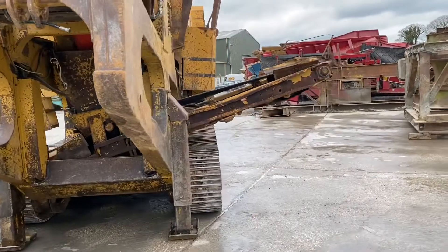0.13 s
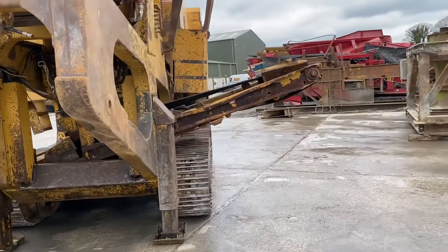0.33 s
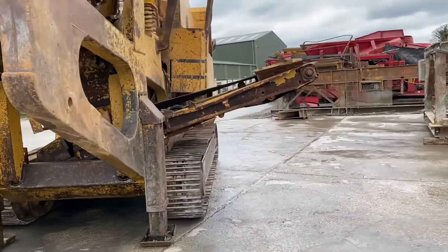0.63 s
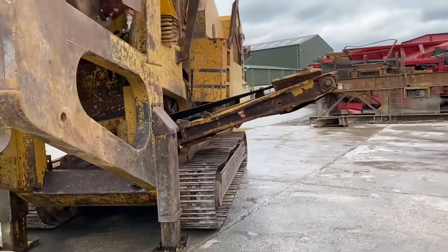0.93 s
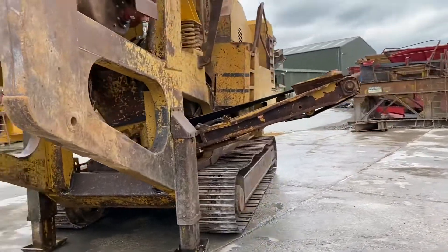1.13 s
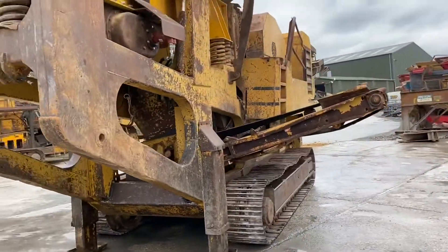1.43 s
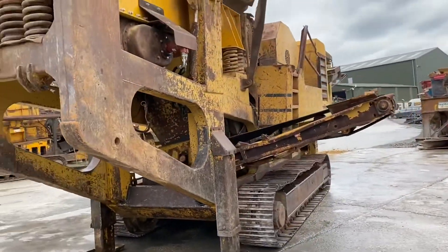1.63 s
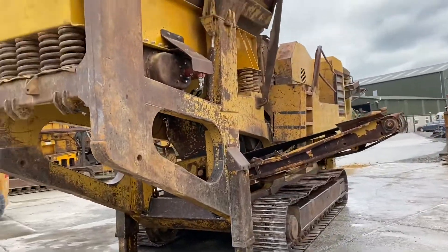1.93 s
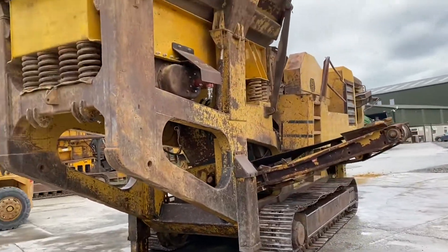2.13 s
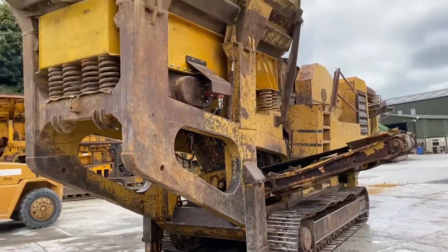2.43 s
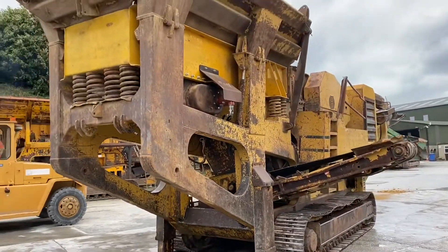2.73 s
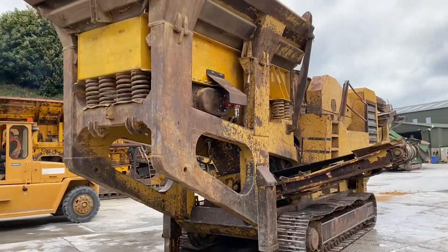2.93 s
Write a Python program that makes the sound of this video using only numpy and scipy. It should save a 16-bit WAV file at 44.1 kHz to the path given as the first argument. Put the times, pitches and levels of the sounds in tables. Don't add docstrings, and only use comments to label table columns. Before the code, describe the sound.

Rock crusher working: irregular stone blows clang and boom on steel above steady engine and fan roar.

```python
import sys
import numpy as np
from scipy import signal
from scipy.fft import rfft, irfft
from scipy.io import wavfile
from scipy.ndimage import uniform_filter1d

SR = 44100
rng = np.random.default_rng(int(sys.argv[2]) if len(sys.argv) > 2 else 0)


def gain_from_db(level_db):
    decades = np.asarray(level_db, float) / 20
    return 10 ** decades


def persist_wave(psi):
    counts = np.round(np.clip(psi, -1, 1) * 32767).astype(np.int16)
    wavfile.write(sys.argv[1], SR, np.atleast_2d(counts).T)


N = 136710


def evened(x):
    return x / np.sqrt(np.mean(x ** 2) + 1e-20)


def read(points, hz):
    f, value = np.transpose(points)
    return np.interp(np.log(hz + 1), np.log(f + 1), value)


def colour(x, points):
    half = np.log(gain_from_db(read(points, np.fft.rfftfreq(8192, 1 / SR))))
    full = np.r_[half, half[-2:0:-1]]
    taps = np.fft.ifft(np.exp(np.conj(signal.hilbert(full)))).real[:4096]
    return signal.oaconvolve(x, taps[None] / np.linalg.norm(taps), axes=1)[:, :N]


def decays(times, levels_db, rise_s, t60_s):
    t, hits = np.arange(SR) / SR, np.zeros(N)
    np.add.at(hits, (np.asarray(times) * SR).astype(int), gain_from_db(2 * levels_db))
    shape = (1 - np.exp(-t / rise_s)) ** 2 * gain_from_db(-120 * t / t60_s)
    power = signal.fftconvolve(hits, shape / shape.max())[:N]
    return np.sqrt(abs(power))


def load_db():
    # t/s, level/dB
    load_points = [(0, -29.5), (.45, -30), (.75, -27), (.85, -27.5), (1.1, -25.5), (1.4, -28.5),
                   (1.86, -25.5), (2.15, -31), (2.5, -30), (2.75, -29.5), (3.1, -30.5)]
    return np.interp(np.arange(N) / SR, *np.transpose(load_points))


def yard(x):
    t60_s = 0.43
    taps = np.zeros((2, SR // 2))
    slots = np.arange(500, SR // 2 - 20, 20)
    at = slots + rng.integers(0, 20, (2, (SR // 2 - 501) // 20))
    np.put_along_axis(taps, at, rng.choice([-1., 1.], at.shape), 1)
    taps *= gain_from_db(-60 * np.arange(SR // 2) / SR / t60_s)
    return signal.fftconvolve(x[:1], taps / np.linalg.norm(taps[0]), axes=1)[:, :N]


def roar():
    # f/Hz, level/dB per Hz
    roar_tone = [(12, -39), (20, -14.5), (58, -9), (182, -3), (410, -8.5), (446, -17.5), (9140, -47),
                 (11100, -56), (16000, -66)]
    level_db, patch_db, follows_load = -19, 1.6, 0.7
    z = signal.stft(rng.standard_normal((2, N + 2048)), nperseg=512)[2]
    drift = uniform_filter1d(rng.standard_normal(z.shape[1:]), 6, 0)
    patches = evened(uniform_filter1d(drift, 10, 1))
    noise = signal.istft(z * gain_from_db(patch_db * patches), nperseg=512)[1][:, :N]
    load = load_db()
    return gain_from_db(level_db + follows_load * (load - load[0])) * evened(colour(noise, roar_tone))


def engine():
    # multiple of the cycle rate [1], level/dB, wander width/Hz
    orders = [(2.5, -34, 1.3), (3, -27, 1.6), (4, -23, 4.5), (7, -30, 6.1), (8, -24, 11.4),
              (10.4, -27.5, 10.2), (13.4, -29, 20.6), (15.4, -37.5, 8.3)]
    cycle_hz, steady = 23.875, 0.62
    t, out = np.arange(N) / SR, np.zeros(N)
    for multiple, db, width in orders:
        r = np.exp(-np.pi * width / SR)
        slow_noise = rng.standard_normal((2, N + SR))
        wander = signal.lfilter([1], [1, -2 * r, r * r], slow_noise)[:, SR:]
        swing = steady + (1 - steady) * (evened(wander[0]) + 1j * evened(wander[1]))
        out += gain_from_db(db) * (swing * np.exp(2j * np.pi * multiple * cycle_hz * t)).real
    return np.array([out, out[::-1]])


def rattle():
    # f/Hz, level/dB per Hz
    click_tone = [(180, -34.5), (300, -6.5), (1120, -12.5), (1340, -16), (6620, -38), (8640, -48),
                  (10600, -37), (16000, -54)]
    plate_hz = [1663, 1862, 2149, 2600, 3240, 3742, 4235, 4787, 5283, 5841, 6425]
    clicks_per_s, spread_db, click_trim_db = 700, -2.5, -1
    pings_per_s, ping_trim_db, ping_t60_s = 110, -12.5, 0.13
    stones = gain_from_db(spread_db * np.minimum(rng.exponential(1, N), 4))
    stones = stones * (rng.random(N) < clicks_per_s / SR)
    n = np.arange(900)
    puff = signal.oaconvolve(stones, n * gain_from_db(-60 * n / SR / 0.027))[:N]
    clicks = evened(colour(rng.standard_normal((2, N)) * puff, click_tone))

    struck = rng.integers(0, len(plate_hz), N)
    t, pings = np.arange(SR // 10) / SR, np.zeros((2, N))
    taps = rng.random(N) * (rng.random(N) < pings_per_s / SR)
    for k, hz in enumerate(plate_hz):
        fade = gain_from_db(-60 * t / ping_t60_s - 1.6 * np.log2(hz / 1300))
        ping = np.sin(2 * np.pi * hz * t) * fade
        pings[k % 2] += signal.oaconvolve(taps * (struck == k), ping)[:N]
    band_db = 8
    return gain_from_db(load_db()) * (gain_from_db(click_trim_db + band_db) * clicks + gain_from_db(ping_trim_db) * evened(pings))


def chips():
    # t/s, level/dB
    snaps = [(0.216, -33), (0.4015, -39), (0.7712, -21), (0.844, -23), (0.9507, -38), (1.0127, -17),
             (1.085, -23), (1.1772, -26), (1.2341, -30), (1.5604, -37), (1.8402, -46), (2.0444, -37),
             (2.4458, -30.5), (2.4773, -34), (2.4892, -22), (2.508, -26), (2.6963, -32)]
    # f/Hz, level/dB per Hz
    snap_tone = [(4000, 10), (6500, -19), (10000, 8), (16000, -18)]
    s, db = np.transpose(snaps)
    envelope = decays(s, db - 1, rise_s=0.0003, t60_s=0.02)
    return colour(rng.standard_normal((2, N)) * envelope, snap_tone)


def booms():
    # t/s, f/Hz, level/dB
    frame_panels = [(0.169, 70.7, -19), (0.558, 189.5, -18), (0.771, 190.2, -10.5), (.78, 255.6, -15),
                    (0.791, 310.6, -11), (.85, 213, -18), (0.968, 153, -14), (0.998, 314, -17),
                    (1.029, 114.3, -12.5), (1.17, 252.7, -18), (1.472, 172, -16), (1.641, 90, -27),
                    (1.992, 367.5, -20.5), (2.28, 96, -13.5), (2.281, 360, -18), (2.481, 91, -12),
                    (2.498, 176, -13.5), (2.5, 302.2, -17.5), (2.879, 66.6, -15.5)]
    # t/s, f/Hz, level/dB
    side_panels = [(0.019, 292, -17), (0.119, 174, -23), (0.374, 454, -19), (0.542, 198, -11.5),
                   (0.767, 171, -6), (1.439, 173, -12), (1.489, 188.4, -10), (1.49, 490, -15.5),
                   (1.767, 181, -19.5), (1.994, 353, -16.2), (2.267, 166.5, -20.5), (2.281, 378, -14),
                   (2.502, 299.4, -9.5), (2.68, 371, -16), (2.809, 410, -22), (2.988, 399, -20)]
    out, t = np.zeros(N + SR), np.arange(SR // 2) / SR
    # panels, rise [s], t60 [s], trim [dB]
    groups = [(frame_panels, 0.012, 0.33, 0), (side_panels, 0.0044, 0.1, 2.5)]
    for panels, rise_s, t60_s, trim_db in groups:
        for s, hz, db in panels:
            swell = (1 - np.exp(-t / rise_s)) * gain_from_db(db + trim_db + 5.5 - 60 * t / t60_s)
            out[round(s * SR):][:len(t)] += np.sin(2 * np.pi * hz * t) * swell
    return np.array([out[:N], np.zeros(N)])


def rings():
    # t/s, f/Hz, level/dB, time to fade by 60 dB/s
    loose_plates = [(.115, 2380, -30, 0.045), (.385, 6700, -47, 0.091), (0.928, 2780, -34, 0.05),
                    (1.013, 10200, -52, 0.19), (1.095, 3745, -32, 0.19), (1.09, 6422, -43.5, 0.61),
                    (1.202, 4340, -41, 0.15), (1.23, 6490, -37, .08), (1.28, 6480, -45.5, .1),
                    (3.01, 4380, -37, 0.04), (1.383, 4790, -37, 0.2), (1.424, 4780, -41, 0.3),
                    (1.51, 4300, -39, .1), (1.63, 4240, -42, 0.2), (1.692, 4240, -42, .3),
                    (1.661, 3240, -35, 0.1), (1.835, 6480, -39.5, .08), (1.845, 5800, -38, .04),
                    (1.885, 6680, -33.5, 0.062), (1.914, 4250, -41, 0.25), (2.31, 2570, -33, .1),
                    (2.345, 6860, -36, 0.045), (2.445, 1330, -24, 0.083), (2.5095, 6900, -14.5, 0.012),
                    (2.518, 4770, -34, .04), (2.691, 2280, -38, 0.12), (2.642, 520, -21, .035),
                    (2.868, 2050, -24, 0.03), (2.881, 2515, -26, 0.03), (2.892, 2960, -32, .04)]
    # t/s, f/Hz, level/dB
    clinks = [(0.334, 1981, -34.5), (0.375, 2799, -36), (0.378, 2132, -31.5), (0.77, 5254.0, -38),
              (0.778, 1206, -30), (0.778, 1916, -27), (0.783, 7092.0, -38), (0.789, 3503.0, -34.5),
              (0.818, 6316.0, -35.5), (0.825, 926, -22.5), (1.009, 6460.0, -36), (1.019, 2929, -40),
              (1.035, 1637, -26.5), (1.051, 2649, -33), (1.166, 1098, -18.5), (1.357, 6517.0, -39),
              (1.364, 1658, -32), (1.364, 2153, -32.5), (1.491, 2326, -33.0), (1.504, 2024, -40),
              (1.65, 2584, -36), (1.671, 5340.0, -43), (1.997, 1981, -31.0), (2.015, 6546.0, -44.1),
              (2.051, 2519, -34), (2.269, 1550, -29.0), (2.27, 4881.0, -37), (2.275, 4393.0, -40),
              (2.282, 5139.0, -39.1), (2.449, 1292, -27.5), (2.52, 3761.0, -37.6), (2.807, 3732.0, -31.5),
              (2.865, 1873, -35), (2.866, 1701, -30.5), (3.008, 5139.0, -41.5)]
    clink_t60_s, clink_trim_db, roughness = 0.075, 1, 0.7
    walls = [(s, hz, db + clink_trim_db, clink_t60_s) for s, hz, db in clinks]
    out, t = np.zeros(N + SR), np.arange(SR // 2) / SR
    for s, hz, db, t60 in list(loose_plates) + walls:
        shake = evened(uniform_filter1d(rng.standard_normal(len(t)), size=300))
        chatter = 1 + roughness * np.minimum(t / 0.022, 1) * shake
        fade = np.minimum(t / 0.0011, 1) * gain_from_db(db + 10.5 - 60 * t / t60)
        out[round(s * SR):][:len(t)] += np.sin(2 * np.pi * hz * t) * chatter * fade
    return np.array([out[:N], np.zeros(N)])


def blows():
    # t/s, level/dB, crack relative to it/dB, fizz relative to it/dB
    stones = [(0.1154, -25, -30, -18), (0.3344, -19.5, -40, -36), (0.3794, -23.5, -16, -21),
              (0.677, -24, -26, -19), (0.77, -14, -13, -14), (0.789, -27, -12, -23),
              (0.823, -17.5, -17.5, -20), (0.8664, -18.5, -18, -12), (0.945, -15.5, -30, -29),
              (0.992, -11.5, -33, -33), (1.014, -21, -20, -14), (1.047, -16, -15.5, -26),
              (1.0865, -19.5, -18, -24), (1.1754, -12.5, -21, -28), (1.254, -18, -22, -22),
              (1.364, -17.5, -24, -22.5), (1.4865, -13.5, -21, -26), (1.6034, -12, -17.5, -32),
              (1.667, -17, -21, -11), (1.787, -14.5, -27, -40), (1.8684, -14, -27, -37),
              (2.0104, -19.5, -14.5, -20), (2.266, -14, -19.5, -13.5), (2.286, -22, -14, -18),
              (2.3044, -19, -17, -21), (2.442, -15.5, -34, -31), (2.506, -15, -26, -29),
              (2.524, -34, -16, -30), (2.643, -17, -23, -43), (2.803, -17, -19, -38),
              (2.8684, -20.5, -26, -32), (3.0034, -23, -14, -17)]
    # f/Hz, level/dB per Hz
    thud_tone = [(60, -30), (120, -8), (190, 0), (330, 0), (600, -7), (1000, -25)]
    clang_tone = [(300, -40.5), (600, 3), (1200, -0.5), (2400, -2), (4000, -17), (6000, -45)]
    crack_tone = [(2500, -23), (4000, 8), (6500, -0.5), (7800, -5), (9500, -35)]
    fizz_tone = [(6500, -4), (8500, -6), (11000, -4), (16000, -37)]
    s, db, crack_db, fizz_db = np.transpose(stones)
    # tone, level [dB], rise [s], t60 [s]
    parts = [(thud_tone, db - 6.5, 0.004, 0.2),
             (clang_tone, db - 5.5, 0.0016, 0.38),
             (crack_tone, db + crack_db + 4, 0.0015, 0.1),
             (fizz_tone, db + fizz_db + 4, 0.0015, 0.12)]
    jolts = uniform_filter1d(rng.exponential(1, N) ** 2, size=200)
    bounces = evened(gain_from_db(3 * evened(jolts)))
    out = np.zeros((2, N))
    for tone, level_db, rise_s, t60_s in parts:
        noise = rng.standard_normal((2, N)) * bounces
        out += colour(noise * decays(s, level_db, rise_s, t60_s), tone)
    return out


def ports(x):
    # f/Hz, share [0-1]
    likeness = [(60, .99), (150, .97), (380, .87), (950, .57), (2380, .56), (5500, .4), (7800, .962),
                (15000, .975)]
    # f/Hz, angle/rad
    left_leads = [(100, 0.018), (780, 0.54), (2150, 0.73), (2840, 0.52), (4220, 0.05)]
    # f/Hz, level/dB
    left_louder = [(60, 1), (180, -1.5), (550, 1.5), (1650, 2.0), (4970, 1.5), (15000, -2)]
    # f/Hz, level/dB
    response = [(32, -17), (50, 6.5), (65, 2), (12300, -4.5), (13800, -7), (16000, -13)]
    spin_from_hz, hz_per_half_turn, spin_steps, top_hz = 6950, 2050, 0.45, 15850
    hz, (a, b) = np.fft.rfftfreq(N, 1 / SR), rfft(x)
    same = np.clip(read(likeness, hz), 0, 1)
    tilt = gain_from_db(read(left_louder, hz) / 2)
    spin = np.pi * np.maximum(hz - spin_from_hz, 0) / hz_per_half_turn
    lead = read(left_leads, hz) - spin + spin_steps * np.sin(2 * spin)
    right = same * a * np.exp(-1j * lead) + np.sqrt(1 - same ** 2) * b
    both = np.array([a * tilt, right / tilt])
    return irfft(both * gain_from_db(read(response, hz)) * (hz < top_hz), N)


def scene():
    hits, plates = blows(), rings()
    echoes = gain_from_db(-4.5) * yard(hits + 0.35 * plates)
    around = hits + plates + booms() + echoes + rattle() + roar() + engine()
    return ports(around) + chips()


def patchy_treble(x):
    from_hz, limit = 13700, -0.1
    hz, _, z = signal.stft(x, SR, nperseg=1024)
    drift = uniform_filter1d(rng.standard_normal(z.shape[1:]), size=16, axis=0)
    patches = evened(uniform_filter1d(drift, size=7, axis=1))
    kept = (patches > limit) | (hz < from_hz)[:, None]
    return signal.istft(z * kept, SR, nperseg=1024)[1][:, :N]


def roll_off(x):
    return signal.sosfilt(signal.butter(12, 16670, fs=SR, output="sos"), x)


def record(dry):
    knee = 1.25
    limited = knee * np.tanh(dry / knee)
    return roll_off(patchy_treble(limited))


dry = scene()
out = record(dry)
persist_wave(out)
```